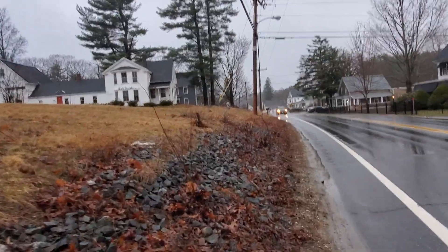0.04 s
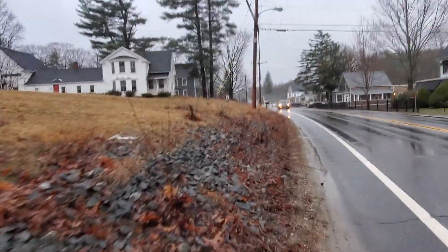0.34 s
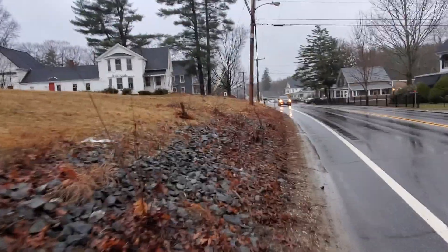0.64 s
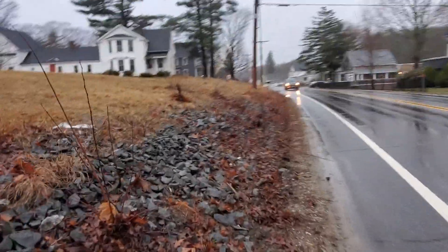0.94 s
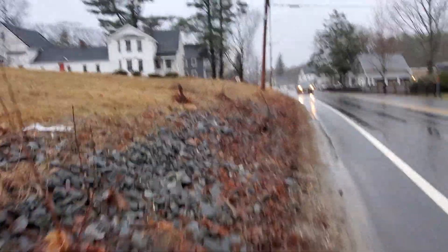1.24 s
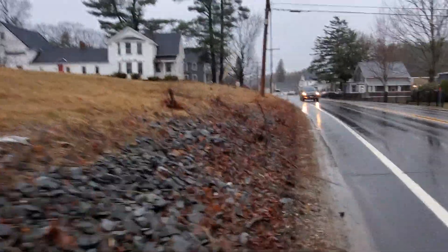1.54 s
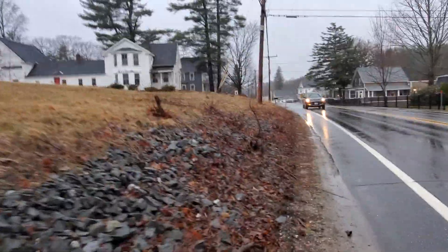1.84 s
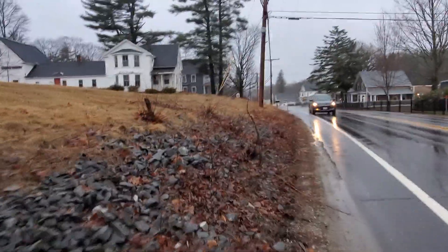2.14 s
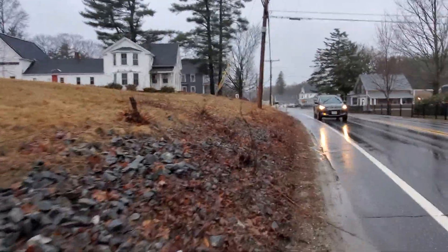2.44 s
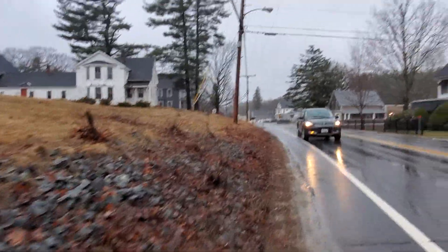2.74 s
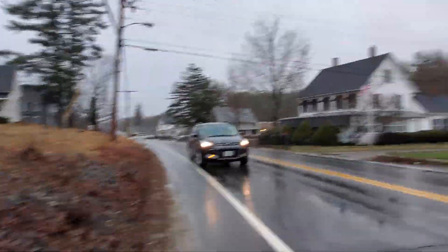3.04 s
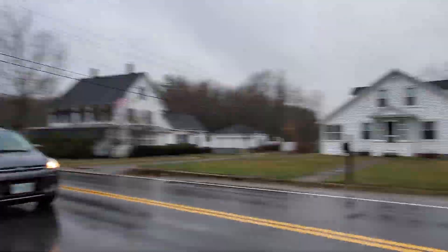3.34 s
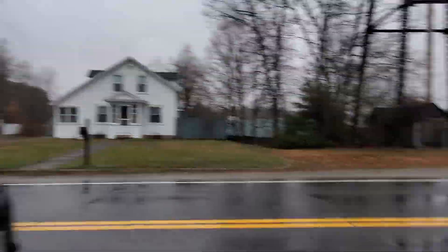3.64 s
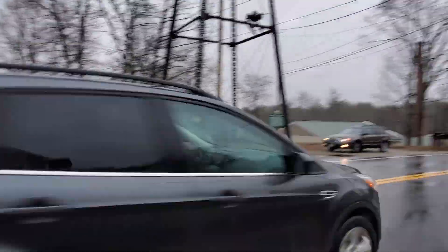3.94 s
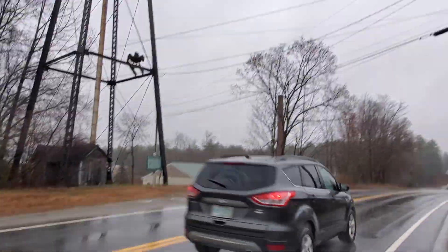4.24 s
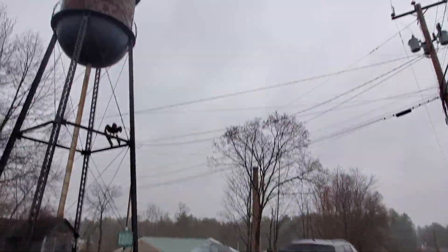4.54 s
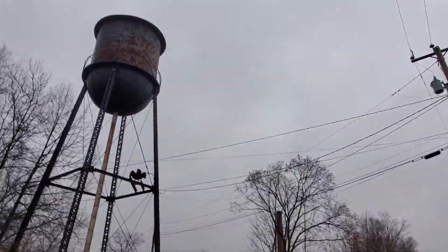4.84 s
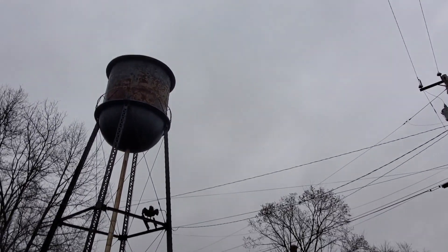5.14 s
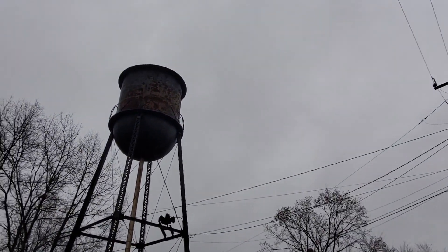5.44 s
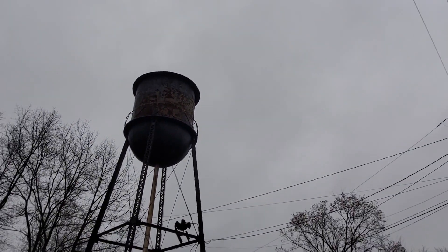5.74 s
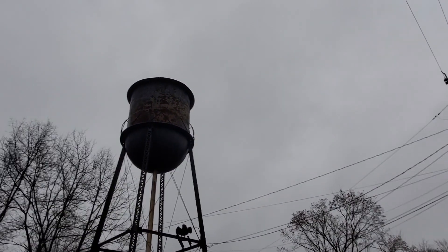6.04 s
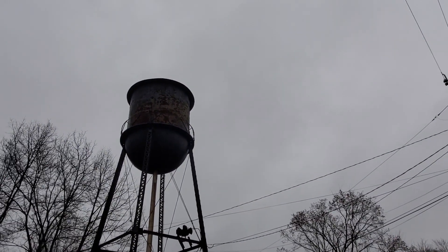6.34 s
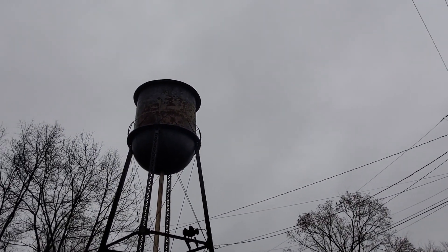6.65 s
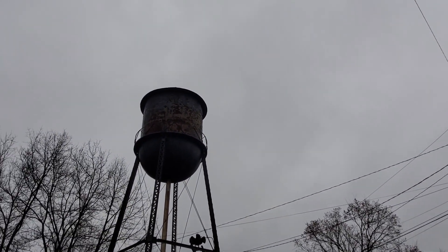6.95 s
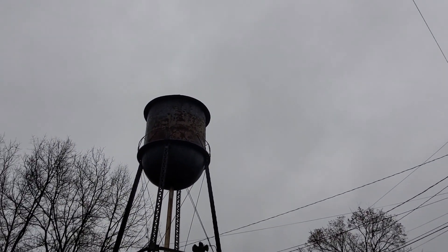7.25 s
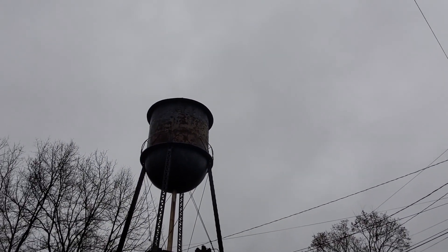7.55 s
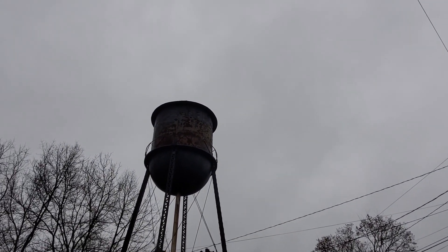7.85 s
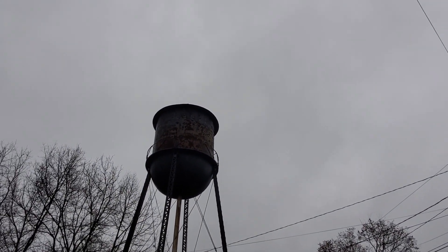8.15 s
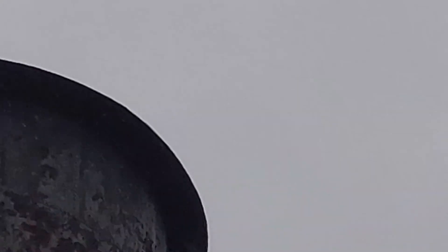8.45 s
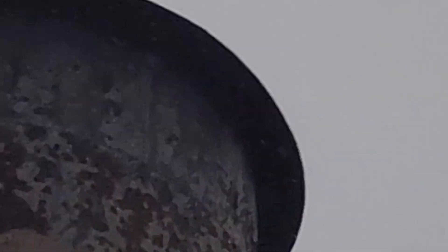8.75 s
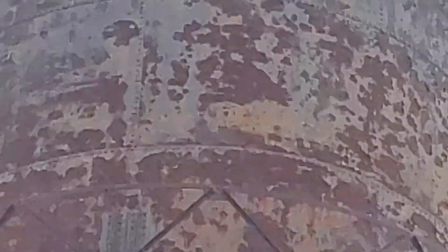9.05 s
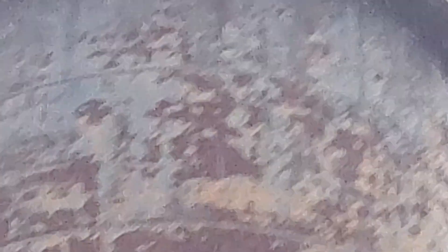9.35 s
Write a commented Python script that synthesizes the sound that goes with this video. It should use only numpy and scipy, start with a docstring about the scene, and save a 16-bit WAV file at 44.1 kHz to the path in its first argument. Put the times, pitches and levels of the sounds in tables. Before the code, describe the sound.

For the first three seconds, someone takes about six steps on a gravel roadside, close below the microphone. Dead leaves crackle and loose stones click, ring briefly and scrape. Behind the steps, a car approaches on the wet road, its tyre hiss growing steadily. The steps stop at about 3 seconds. The car passes close at around 3.7 seconds, with a loud tyre roar, bright water spray and a low engine rumble. As it recedes, a second car passes in the far lane at about 6 seconds, softer and duller, its hiss fading slowly until the end at about 9.5 seconds. A hand brushes the microphone just after 5 seconds, briefly hollowing the hiss. Soft finger thuds come between 1 and 2 seconds, around 6 and near 8.6, mostly on the left. Nearly everything else is heard on the right.

```python
"""Two cars pass on a rain-wet road, tyres roaring and hissing as they fling water: one about 6 m from
the microphone, then one in the far lane, 8.5 m off. At the verge, someone holding a camera takes six
steps on gravel and dead leaves, knocking and scraping stones, then stands still. The left microphone
port is covered, so nearly everything arrives on the right. A reflection off the holder combs the hiss
as the camera turns, fingers bump the case, and a hand briefly cups the open port."""
import sys
import numpy as np
from scipy import signal
from scipy.fft import rfft, irfft, next_fast_len
from scipy.io import wavfile
from scipy.ndimage import uniform_filter1d, map_coordinates

SR = 44100
rng = np.random.default_rng(int(sys.argv[2]) if len(sys.argv) > 2 else 0)


def master(y):
    """Save y as 16-bit WAV."""
    cut = np.clip(np.atleast_2d(y).T, -1, 1)
    pcm = np.round(cut * 32767)  # scale
    wavfile.write(sys.argv[1], SR, pcm.astype(np.int16))


N = 418950
SPEED_M_PER_S, SOUND_M_PER_S = 14, 343
NEAR_S, NEAR_M, FAR_S, FAR_M = 3.733, 6.41, 5.865, 8.5  # when each car is abreast, and how far off
TOP_HZ = 15880  # the camera's band limit


def traffic():
    """Wet tyres fling countless droplets; the near car comes and goes, and the far one takes over."""
    water = unit(rng.standard_normal(N) + 0.5 * grains(rate=3500, spread_db=-0.5))
    hz, t, spectrum = signal.stft(water, SR, nperseg=1024, noverlap=768)
    patches = uniform_filter1d(rng.standard_normal(spectrum.shape), size=24, axis=0)
    patches = unit(uniform_filter1d(patches, size=10, axis=1))
    spectrum *= amp(1.15 * patches)  # the water film is uneven
    wet_db = wetness(t)
    spectrum *= np.sqrt(near_car(hz, t, wet_db) + far_car(hz, t, wet_db) + town(hz))
    spectrum *= hiss_colouring(hz, t) * road_bounce(hz, t) * reflections(hz, t) * cupped_hand(hz, t)
    return amp(6) * signal.istft(spectrum, SR, nperseg=1024, noverlap=768)[1][:N]


# Near-lane tyres; rows are carcass roar, tread, water hiss, spray and fine mist:
# relative_level_db, trail_m, coming_db_per_decade, leaving_db_per_decade
NEAR_TYRES = [(-33, -2, 26, 23.2), (-22, 1, 27.5, 32.7), (-23.5, 5.5, 27.5, 22.4), (-27.5, 5, 25, 27.2),
              (-32, -2.5, 19, 17.9)]
# Those tyres heard from ahead and from behind: frequency_hz, relative_db
FRONT_COLOUR = [(140, -52), (230, -24), (317, -11.5), (549, -10.5), (811, -7), (1100, -7), (1620, -4.5),
                (2530, -5), (3870, 1.5), (4540, -5), (5420, -9.5), (7460, -5.5), (8150, -12.5),
                (12000, -13.5), (16000, -20.5)]
REAR_COLOUR = [(140, -53), (230, -22), (421, -10.5), (679, -5.5), (811, -8.5), (1330, -9.5), (2350, -3),
               (4080, -5.5), (5420, -14), (7330, -10.5), (8300, -14.5), (10600, -14.5), (11800, -12.5),
               (15200, -17.5), (16000, -24.5)]
# Roadside bank between car and microphone, a row per tyre part: half_clear_s, loss_db
BANK = [(0.38, 2), (0.37, 4), (1.45, 1.5), (0.41, 6), (1.59, 11)]


def near_car(hz, t, wet_db, clearing_s=0.13, turn_from_m=-5.5, turn_over_m=3.1):
    """Power of the near car, which clears the bank and shows first its front, then its rear."""
    road_m = SPEED_M_PER_S * (t - NEAR_S)
    half_clear_s, loss_db = np.transpose(BANK)[:, :, None]
    screened_db = loss_db * np.clip((half_clear_s - t) / clearing_s + .5, 0, 1)
    levels_db = pass_by(NEAR_TYRES, t, NEAR_S, NEAR_M) + wet_db - screened_db
    rear = np.clip((road_m - turn_from_m) / turn_over_m, 0, 1)
    power = (1 - rear) * tyres(hz, levels_db, FRONT_COLOUR) + rear * tyres(hz, levels_db, REAR_COLOUR)
    return power * air_loss(hz, np.maximum(road_m, 0))


# Far-lane tyres, the same five parts:
# relative_level_db, trail_m, coming_db_per_decade, leaving_db_per_decade
FAR_TYRES = [(-48.5, -4, 26, 2.2), (-38, -6, 180, 8.8), (-39, 19, 29, 4.1), (-42.5, 20, 12.3, 8.7),
             (-47, 2, 18, 11)]
# Tyres heard from a distance: frequency_hz, relative_db
DISTANT_COLOUR = [(140, -54), (230, -13.5), (290, -11), (460, -9.5), (797, -1), (886, -10.5), (1090, -7.5),
                  (1410, -7.5), (2660, -8.5), (4150, -7), (5610, -7.5), (7460, -11), (10400, -27),
                  (12300, -37), (16000, -32)]


def far_car(hz, t, wet_db):
    """Power of the car across the road, dulled by the air on its way to the verge."""
    distance_m = np.hypot(SPEED_M_PER_S * (t - FAR_S), FAR_M)
    levels_db = pass_by(FAR_TYRES, t, FAR_S, FAR_M) + wet_db
    return tyres(hz, levels_db, DISTANT_COLOUR) * air_loss(hz, distance_m)


# Borders of the five tyre parts, from carcass roar up to fine mist: edge_hz
BAND_EDGES = [20, 900, 2200, 4500, 8000, 16000]


def tyres(hz, levels_db, colour):
    """Power of tyre noise: each part fills its own band of the colour."""
    octaves = np.log2(hz + 1)[:, None] - np.log2(BAND_EDGES)
    above = .5 + .5 * np.tanh(octaves / 0.19)
    power = (above[:, :-1] - above[:, 1:]) * amp(along(colour, hz))[:, None] ** 2
    return np.abs(power / power.mean(axis=0)) @ amp(levels_db) ** 2


def pass_by(parts, t, abreast_s, side_m):
    """Level in dB of each part of a car: it falls with distance, at one rate coming, another leaving."""
    db, trail_m, coming, leaving = np.transpose(parts)[:, :, None]
    road_m = SPEED_M_PER_S * (t - abreast_s) - trail_m
    return db - np.where(road_m < 0, coming, leaving) * np.log10(np.hypot(road_m / side_m, 1))


# Standing water on the road: centre_s, half_length_s, hiss_db, spray_db, mist_db
PUDDLES = [(1.72, 0.34, 6.5, 3.5, -6), (3.394, 0.18, 1, 10, 2.5), (5.92, 0.11, -0.5, 4.5, 2),
           (7.37, 0.2, 3, 1, 3.5)]


def wetness(t, uneven_db=0.45):
    """Extra dB for each tyre part: puddles change the watery ones, and the road is never quite even."""
    puddle_db = sum(np.outer([0, 0, *water_db], np.exp(-((t - s) / half_length) ** 2))
                    for s, half_length, *water_db in PUDDLES)
    return puddle_db + uneven_db * np.array([wobble(t, rate=4) for _ in puddle_db])


# Peaks and hollows that come and go in the road hiss as each car passes the microphone:
# pitch_hz, width_octaves, gain_db, strongest_at_m, reach_m
NEAR_COLOURING = [(354, 0.64, 9, 3.5, 6.2), (873, 0.2, 9.5, 14, 8.6), (2420, 0.24, 5, 8.5, 3),
                  (3300, 0.2, 5, 13.5, 9.7), (4340, 0.16, 5.5, -6, 1.2), (1590, 0.61, -10, -3.5, 1.55),
                  (2300, 0.3, 10, -4.5, 1.85), (1990, 0.28, -6.5, -0.9, 2.9), (4700, 0.72, 4, 2.5, 1.2),
                  (1570, 0.24, -3.5, -10, 2.7), (750, 0.22, 3.5, -11.5, 5.4), (2400, 0.061, -1, -18, 5.8),
                  (4330, .1, 1.5, -6.5, 1.3), (2060, 0.13, -2.5, 11.5, 2.4), (3130, .2, -4.5, -1, 2),
                  (795, 1.5, 3.5, -1, 1.2), (6800, 0.066, -5, -22, 9.6), (4300, 0.045, 3, 19, 2.7),
                  (5430, 0.047, 5.5, 20, 2.1)]
FAR_COLOURING = [(1080, 0.2, 5, 23, 27), (1480, 0.47, 4, 7.3, 3.7), (2810, 0.092, -5.5, 2.2, 19),
                 (3800, .1, -6, 11.3, 3.5), (4200, .07, 7, 20.5, 3.9), (1500, 0.27, -3, 22, 1.5),
                 (2230, 0.38, 2.5, 33.5, 14), (2850, 0.07, 5.5, 39, 4.3), (2920, .17, 4, 51, 2),
                 (3680, 0.12, 4.5, 44, 8.2), (4150, 0.1, -6.5, 32, 14), (4770, 0.29, -4, 67, 28),
                 (5770, 0.041, -6, 35, 35), (10600, 0.08, -3, 17, 4.7)]


def hiss_colouring(hz, t):
    """Peaks and hollows come and go in the road hiss, sliding down in pitch as each car passes."""
    gain_db = 0
    for rows, abreast_s, side_m in (NEAR_COLOURING, NEAR_S, NEAR_M), (FAR_COLOURING, FAR_S, FAR_M):
        road_m = SPEED_M_PER_S * (t - abreast_s)
        doppler = 1 / (1 + SPEED_M_PER_S / SOUND_M_PER_S * road_m / np.hypot(road_m, side_m))
        for pitch_hz, octaves, db, at_m, reach_m in rows:
            presence = np.exp(-((road_m - at_m) / reach_m) ** 2)
            gain_db += db * bell(hz, pitch_hz * doppler, octaves) * presence
    return amp(gain_db)


def road_bounce(hz, t, depth_db=8, at_m=-16.5, reach_m=12.3):
    """The bounce off the road cancels a narrow range while the near car approaches."""
    road_m = SPEED_M_PER_S * (t - NEAR_S)
    stretch = np.exp(-((road_m - at_m) / reach_m) ** 4)
    return amp(-depth_db * bell(hz, centre_hz=1026, octaves=0.19) * stretch)


def air_loss(hz, metres, db_per_m=0.093, at_hz=9340):
    """Share of the power left after a path through damp air, which absorbs the treble most."""
    return amp(-db_per_m * metres * (hz[:, None] / at_hz) ** 2) ** 2


# Reflection off the holder, just by the microphone: time_s, delay_ms, strength_ratio
BODY_REFLECTION = [(0, 1.2, .1), (.5, 1.15, .15), (1, 1, .2), (1.4, .85, .27), (1.8, .73, .33),
                   (2.3, .71, .42), (2.7, .66, .43), (3.3, .665, .43), (3.45, .58, .37), (3.56, .52, .36),
                   (3.76, .475, .34), (4, .43, 0), (4.02, 1.05, 0), (4.25, 1.2, .3), (4.55, 1.32, .36),
                   (4.76, 1.56, .27), (5.15, 1.62, .24), (5.4, 1.87, .16), (6, 1.9, .1), (6.6, 1.9, 0)]


def reflections(hz, t, scatter_db=1.17):
    """The holder's body combs the hiss as the camera turns, and the stony ground ripples it."""
    delay_ms, strength = curves(BODY_REFLECTION, t)
    phase_per_ms = 2 * np.pi * hz[:, None] / 1000
    strength = strength / (1 + (hz[:, None] / TOP_HZ) ** 2)  # clothing reflects less treble
    comb = np.sqrt(1 - strength ** 2) / np.abs(1 - strength * np.exp(1j * phase_per_ms * delay_ms))
    # weak paths off the stones stretch together as the direction of the sound changes
    paths = rng.uniform([.9, -.2], [3.2, .5], (8, 2))
    scatter = unit(sum(np.cos(phase_per_ms * (ms + swing * delay_ms)) for ms, swing in paths))
    return comb * amp(scatter_db * scatter * (hz / (hz + 1500))[:, None])


# Hollow of the hand at the open port: time_s, low_notch_hz, low_strength_db, high_notch_hz, high_cut_db
CUPPING = [(5.22, 8000, 0, 16000, 0), (5.29, 6200, 10, 14500, 7), (5.33, 4500, 16, 12000, 7),
           (5.4, 4450, 16, 10200, 6), (5.58, 4500, 15, 8900, 6), (5.72, 5000, 13, 7400, 3),
           (5.85, 5150, 11, 7000, 0), (6.2, 5400, 5, 7000, 0), (7, 5500, 0, 7000, 0)]


def cupped_hand(hz, t, notch_octaves=0.22, lift_ratio=0.41):
    """The hollow of a hand cuts a notch within a broad lift, and cancels two higher ranges too."""
    low_hz, low_db, high_hz, high_db = curves(CUPPING, t)
    away = np.log2((hz[:, None] + 1) / low_hz) / notch_octaves
    hollow = lift_ratio * np.exp(-(away / 4) ** 2) - np.exp(-away ** 2)
    high_notches = bell(hz, high_hz, 0.19) + bell(hz, 1.35 * high_hz, 0.16)
    return amp(low_db * hollow - high_db * high_notches)


# Near car's engine and body: level_db, trail_m, coming_db_per_decade, leaving_db_per_decade
ENGINE = [(-43, 1, 23.7, 29)]
# Low drone in the distance: time_s, level_db
DRONE = [(0, -66), (5.1, -70), (6.4, -58.5), (7.7, -67.5), (8.3, -56.5), (9.5, -62)]
# Colour of both at the verge: frequency_hz, relative_db
RUMBLE_COLOUR = [(20, -21), (35, -16), (54, -0.5), (85, -0.5), (130, -9), (220, -7), (340, -9), (450, -46),
                 (700, -53)]


def rumble():
    """Engines and car bodies drone low under the hiss."""
    t = np.arange(N) / SR
    engine = amp(pass_by(ENGINE, t, NEAR_S, NEAR_M)[0])
    drone = amp(curves(DRONE, t)[0])
    return np.hypot(engine, drone) * coloured(rng.standard_normal(N), RUMBLE_COLOUR)


# Heel, sole or toe on the verge, below the microphone: start_s, length_s, gravel_db, leaf_db
PRESSES = [(0.002, 0.01, -32, -48), (0.2, 0.008, -45, -40), (0.34, 0.022, -29, -33),
           (0.425, 0.02, -34, -39), (0.457, 0.012, -28.5, -47), (0.507, 0.04, -36, -28),
           (0.597, 0.094, -58, -43.5), (0.743, 0.02, -38, -32), (0.848, 0.021, -33.5, -30),
           (0.877, 0.011, -29, -22), (0.947, 0.053, -33.5, -39), (1.091, 0.012, -50, -36),
           (1.151, 0.012, -32, -33), (1.17, 0.038, -31.5, -33), (1.302, 0.016, -31.5, -29),
           (1.323, 0.021, -33, -18.5), (1.361, 0.012, -30, -28), (1.381, 0.03, -32.5, -27),
           (1.476, 0.027, -33.5, -24), (1.7, 0.11, -48, -42), (1.819, 0.018, -25.5, -29),
           (1.836, 0.015, -35, -25), (1.925, 0.0069, -26, -37), (1.964, 0.039, -46, -33),
           (2.2, 0.06, -41, -34), (2.28, 0.019, -34, -29), (2.32, 0.082, -38, -33),
           (2.497, 0.042, -35, -31), (2.636, 0.012, -43, -30), (2.878, 0.015, -24, -33),
           (3.016, 0.019, -24, -25), (3.091, 0.013, -25, -43)]
# Ring of the gravel: frequency_hz, relative_db
GRAVEL_COLOUR = [(1000, -12.5), (2500, 1), (3100, 6), (3700, 11.5), (4700, -2.5), (5700, 7.5), (6300, 4.5),
                 (7200, 6), (8200, -2), (9400, -0.5), (10200, -10.5), (16000, -13.5)]
# Crackle of dead leaves, with the camera body's treble resonances: frequency_hz, relative_db
LEAF_AND_CAMERA_COLOUR = [(3000, -17), (7500, -6), (8600, -6), (9500, 2), (10300, -1.5), (11200, 9.5),
                          (12100, 2.5), (12800, -3), (13300, 14), (13800, 2), (14300, 8.5), (15000, 8),
                          (15700, 8.5), (16000, -6)]


def footsteps():
    """Each press of a shoe grinds stones, which ring briefly, and crushes dead leaves, which crackle."""
    out, lead = np.zeros(N + SR), SR // 100
    t = np.arange(-lead, SR // 5) / SR
    for s, length, gravel_db, leaf_db in PRESSES:
        settling = 0.17 * press(t, length, rise=0.015, release=0.08)
        weight = press(t, length, rise=0.0095, release=.008) + settling
        gravel = crackle(weight, GRAVEL_COLOUR, rate=600, t60=0.0062)
        leaves = crackle(weight, LEAF_AND_CAMERA_COLOUR, rate=1200, t60=0.0099)
        out[max(round(s * SR), 0):][:len(t)] += amp(gravel_db) * gravel + amp(leaf_db) * leaves
    return out[lead:][:N]


def crackle(weight, colour, rate, t60, spread_db=8, most=1500):
    """Tiny impacts follow the weight, each ringing at three pitches drawn from a colour."""
    t, hz = np.arange(SR // 80) / SR, np.arange(colour[0][0], TOP_HZ)
    impacts = int(np.clip(rate * weight.sum() / SR, 1, most))
    when, size, *pitches = rng.random((most, 5))[:impacts].T
    start = np.searchsorted(np.cumsum(weight) / weight.sum(), when)
    share = np.cumsum(amp(along(colour, hz)) ** 2)
    modes_hz = np.interp(pitches, share / share[-1], hz)
    rings = np.sin(2 * np.pi * modes_hz[:, :, None] * t).sum(axis=0) * amp(-60 * t / t60)
    rings *= (np.sqrt(weight[start]) * amp(spread_db * (2 * size - 1)))[:, None]
    samples = start[:, None] + np.arange(len(t))
    out = np.bincount(samples.ravel(), rings.ravel(), len(weight))[:len(weight)]
    low_cut = signal.butter(2, 2000, 'highpass', fs=SR, output='sos')  # too small to radiate bass
    out = signal.sosfilt(low_cut, out)
    return out * np.linalg.norm(weight) / np.linalg.norm(out)


# Stones and chips kicked loose underfoot: start_s, peak_db, main_hz, upper_hz, upper_over_main_db, t60_s
STONES = [(0.151, -20.5, 4000, 7700, -3, 0.01), (0.3183, -21, 3110, 7360, -14, .018),
          (0.3495, -9.5, 3310, 7100, 0, .012), (0.4186, -18, 3180, 5680, 4, .018),
          (0.4545, -16.5, 3740, 6540, 2, .028), (0.4984, -13, 3470, 5600, 9, 0.019),
          (0.558, -16, 3600, 5740, 2, 0.0068), (0.573, -18, 3680, 6560, 0, 0.0072),
          (0.7003, -23, 3670, 4450, -2, 0.0092), (0.8845, -16, 3660, 5700, -5, 0.0091),
          (0.9018, -18, 3700, 5800, -7, 0.0051), (0.9619, -12.5, 3500, 5640, -8, 0.01),
          (0.971, -17, 3600, 5700, -4, .007), (0.98, -13, 3700, 5760, -6, 0.0077),
          (1.0537, -13, 3930, 6980, -2, 0.012), (1.1524, -15, 4120, 6500, 5, .012),
          (1.1699, -5.5, 3550, 5620, 3.5, .022), (1.2008, -15, 3670, 5900, 5, .015),
          (1.325, -9, 5000, 10900, 5, 0.018), (1.3645, -13, 3530, 5570, -2, 0.022),
          (1.5994, -6, 3380, 4870, 2, .013), (1.547, -17.5, 3900, 5900, -0.5, .008),
          (1.6215, -13, 3800, 5600, -2, .008), (1.8888, -13, 4120, 5700, -7, 0.017),
          (1.9367, -7, 3970, 6610, 0, 0.011), (1.9601, -9, 3700, 5960, 0, 0.013),
          (2.0843, -15, 3650, 7350, -17, .022), (2.166, -13, 8150, 15100, 14, .02),
          (2.2993, -6.5, 3690, 5800, -14, .03), (2.4041, -11.5, 3620, 7600, -9, .022),
          (2.5428, -10.5, 3500, 7240, -6, 0.011), (2.8446, -8, 3150, 6860, -6, 0.012),
          (2.9957, -6, 3740, 6660, -10, 0.037), (3.0287, -6, 4570, 5300, 4, 0.015),
          (3.1185, -8.5, 3640, 6330, -11, .025)]


def stones(crack_t60=0.016, crack_db=-8):
    """A knocked stone cracks and rings for a moment: two close pairs of modes, a main and an upper."""
    out, t = np.zeros(N + SR), np.arange(SR // 20) / SR
    for s, db, main_hz, upper_hz, upper_db, t60 in STONES + grit():
        hz = np.outer([main_hz, upper_hz], [1, rng.uniform(1.03, 1.08)]).ravel()
        gains = np.outer([1, amp(upper_db)], [1, .5]).ravel()
        ring = unit(gains @ np.sin(2 * np.pi * hz[:, None] * t)) * amp(-60 * t / t60)
        crack = coloured(rng.standard_normal(len(t)), GRAVEL_COLOUR) * amp(-60 * t / crack_t60)
        knock = (ring + amp(crack_db) * crack) * (1 - np.exp(-t / .0003))
        out[round(s * SR):][:len(t)] += amp(db) * knock / np.abs(knock).max()
    return out[:N]


def grit(count=2, peak_db=-26, spread_db=5.5, within_s=0.1, t60=0.006):
    """Weak random knocks after each shoe press but the first two, as rows like those of STONES."""
    press_s = np.repeat([row[0] for row in PRESSES[2:]], count)
    return [(s + within_s * when, peak_db + spread_db * (2 * size - 1),
             3100 + 2000 * main, 5300 + 2400 * upper, 0, t60)
            for s, (when, size, main, upper) in zip(press_s, rng.random((len(press_s), 4)))]


# Stones dragged under a sole: start_s, length_s, level_db, main_hz, upper_hz, upper_over_main_db
SCRAPES = [(0.338, 0.027, -31, 3400, 7120, 0.5), (1.366, 0.03, -29, 3730, 5600, -5),
           (1.837, 0.02, -18, 4160, 5680, -6), (2.283, 0.028, -30, 3700, 5720, -12)]


def scrapes(slips_per_s=1500, t60=0.019):
    """A stone dragged over another sticks and slips, which keeps its two modes ringing."""
    out, lead = np.zeros(N + SR), SR // 100
    t = np.arange(SR // 15) / SR
    for s, length, db, main_hz, upper_hz, upper_db in SCRAPES:
        weight = press(t - lead / SR, length, rise=0.0051, release=0.0065)
        slips = weight * grains(slips_per_s, spread_db=5, size=len(t))
        for hz, mode_db in (main_hz, db), (upper_hz, db + upper_db):
            mode = np.sin(2 * np.pi * hz * t) * amp(-60 * t / t60)
            ring = signal.fftconvolve(slips, mode)[:len(t)]
            ring *= np.linalg.norm(weight) / np.linalg.norm(ring)
            out[round(s * SR):][:len(t)] += amp(mode_db) * ring
    return out[lead:][:N]


# Fingers on the camera, right at the microphones: start_s, length_s, left_db, right_db
BUMPS = [(1.079, 0.016, -35, -68), (1.176, 0.011, -32, -72), (1.257, 0.0071, -31.5, -57),
         (1.3, 0.065, -39.5, -59), (1.353, 0.15, -48.5, -64), (1.688, 0.026, -42, -62),
         (5.85, 0.18, -53, -53), (5.996, 0.12, -47, -52), (6.646, 0.23, -59, -66), (8.58, 0.04, -48, -65)]
# Thud of the case: frequency_hz, relative_db
THUD_COLOUR = [(20, -7), (45, 6), (70, 12.5), (110, -3), (200, -7), (380, -12), (900, -56)]


def handling():
    """Fingers thud on the case, mostly over the covered port."""
    t = np.arange(N) / SR
    force = sum(amp([[left_db], [right_db]]) * press(t - s, length, rise=.004, release=.012)
                for s, length, left_db, right_db in BUMPS)
    return force * np.array([coloured(rng.standard_normal(N), THUD_COLOUR) for _ in range(2)])


def brush(start_s=5.222, length_s=0.014, level_db=-31):
    """The hand brushes the rim of the open port as it closes round it."""
    skin = coloured(rng.standard_normal(N), [(3000, -30), (6500, 2), (12500, 15), (16000, -17)])
    return amp(level_db) * press(np.arange(N) / SR - start_s, length_s, rise=.012, release=.012) * skin


# Traffic far from the verge, one value per tyre part: relative_level_db
TOWN_DB = [-72, -72.5, -71, -78, -88]


def town(hz):
    """Power of the faint, steady wash of distant tyres."""
    return tyres(hz, np.array(TOWN_DB)[:, None], DISTANT_COLOUR)


def amp(db):
    """Decibels to gain."""
    return 10 ** (np.asarray(db) / 20)


def unit(x):
    """x at rms 1."""
    return x / np.sqrt(np.mean(x ** 2) + 1e-20)


def along(points, hz):
    """(Hz, value) points read on a log axis."""
    f, v = np.transpose(points)
    return np.interp(np.log(hz + 1), np.log(f + 1), v)


def curves(rows, t):
    """Each column after the time, read at the times t."""
    s, *cols = np.transpose(rows)
    return np.array([np.interp(t, s, c) for c in cols])


def bell(hz, centre_hz, octaves):
    """A bump on the log frequency axis."""
    return np.exp(-np.minimum(((np.log2(hz[:, None] + 1) - np.log2(centre_hz)) / octaves) ** 2, 20))


def filtered(x, response):
    """x through a frequency response."""
    m = next_fast_len(x.shape[-1] + 8192)
    return irfft(rfft(x, m) * response(np.fft.rfftfreq(m, 1 / SR)), m)[..., :x.shape[-1]]


def coloured(x, colour):
    """x with a (Hz, dB) colour, at rms 1."""
    return unit(filtered(x, lambda hz: amp(along(colour, hz))))


def grains(rate, spread_db, size=N):
    """Random tiny impacts of uneven size, rms 1."""
    strength = amp(spread_db * np.clip(rng.standard_normal(size), -2, 2))
    return unit((rng.random(size) < rate / SR) * strength * rng.choice([-1, 1], size))


def press(t, length, rise, release):
    """A contact that builds at t = 0, holds for its length and lets go."""
    return np.clip(t / rise + .5, 0, 1) * np.exp(-np.clip((t - length) / release + .5, 0, 50))


def wobble(t, rate):
    """A smooth random curve, rate knots a second."""
    return map_coordinates(rng.standard_normal(200), [t * rate], mode="mirror")


# Leak through the cover on the left microphone: frequency_hz, gain_db
COVER_LEAK = [(30, -24), (110, -47), (380, -64.5), (700, -52.5), (4400, -52.5), (8000, -74), (11000, -46),
              (15000, -16)]


def scene(leak_delay_s=0.000405):
    """The right microphone hears everything; only a trace leaks into the left, over its own noise."""
    air = traffic() + rumble() + footsteps() + stones() + scrapes() + brush()
    leak = filtered(air, lambda hz: amp(along(COVER_LEAK, hz)) * np.exp(-2j * np.pi * hz * leak_delay_s))
    noise_colour = [(30, 3), (100, -8), (400, -19.5), (2000, -25), (8000, -38), (16000, -21)]
    self_noise = amp(-67) * coloured(rng.standard_normal(N), noise_colour)
    return np.array([leak + self_noise, air]) + handling()


# Colour of the microphone port: frequency_hz, gain_db
PORT_COLOUR = [(4900, -2), (5450, -2), (6000, -1.5), (7000, -1.5), (7500, 0), (8100, -3.5), (8800, -0.5)]


def record(dry):
    """The port colours the treble, and the camera keeps nothing above its band limit."""
    return filtered(dry, lambda hz: amp(along(PORT_COLOUR, hz)) * (hz < TOP_HZ))


dry = scene()
out = record(dry)
master(out)
```